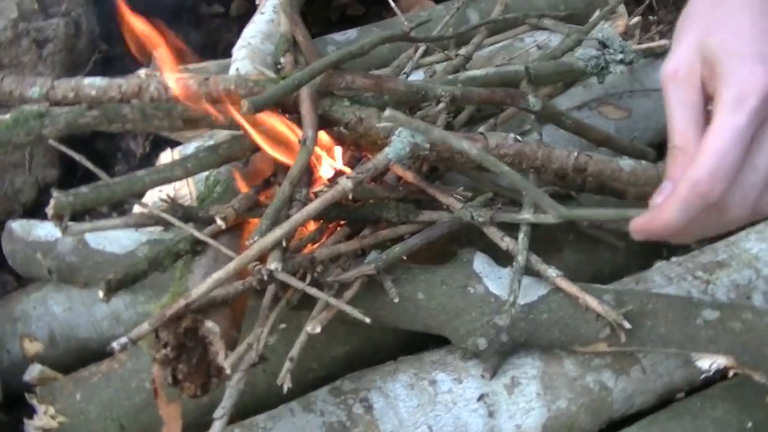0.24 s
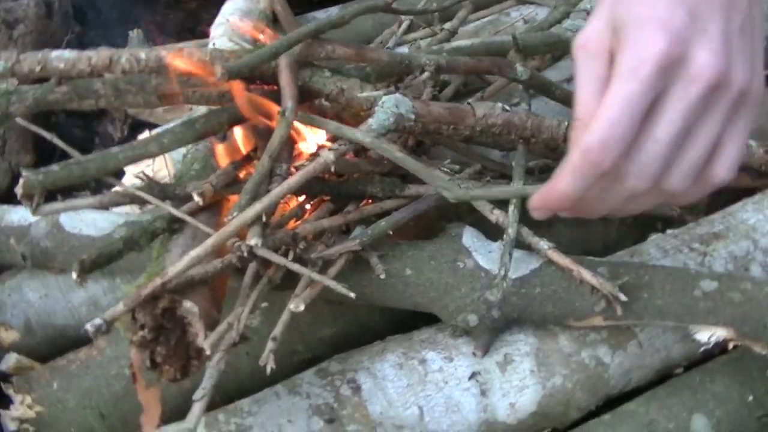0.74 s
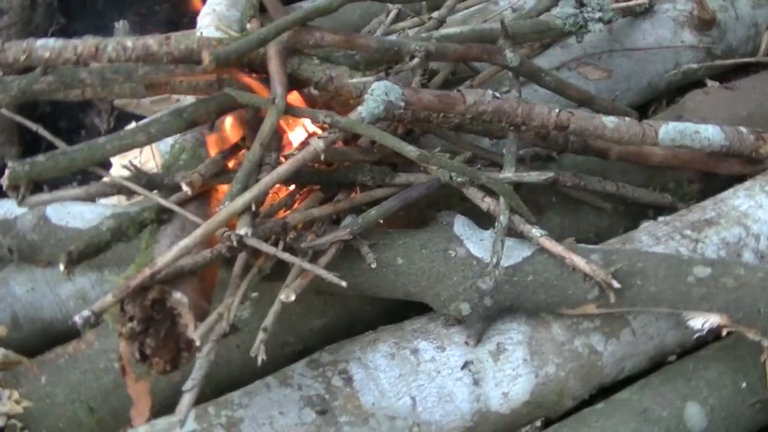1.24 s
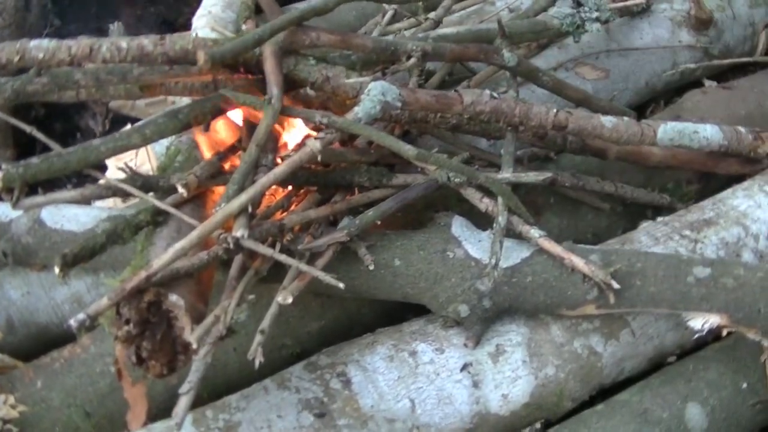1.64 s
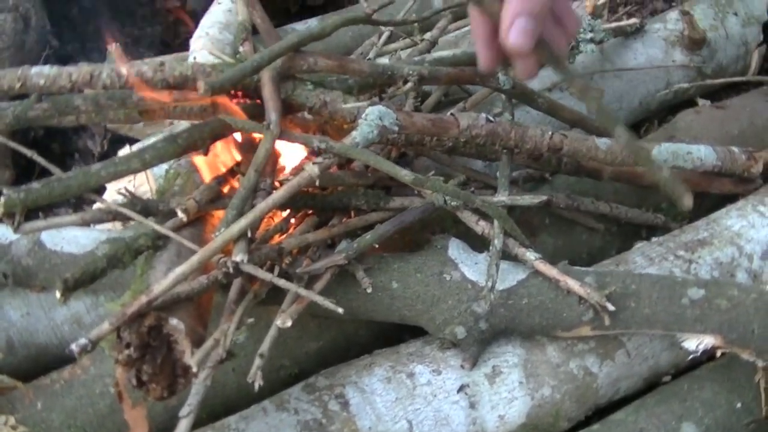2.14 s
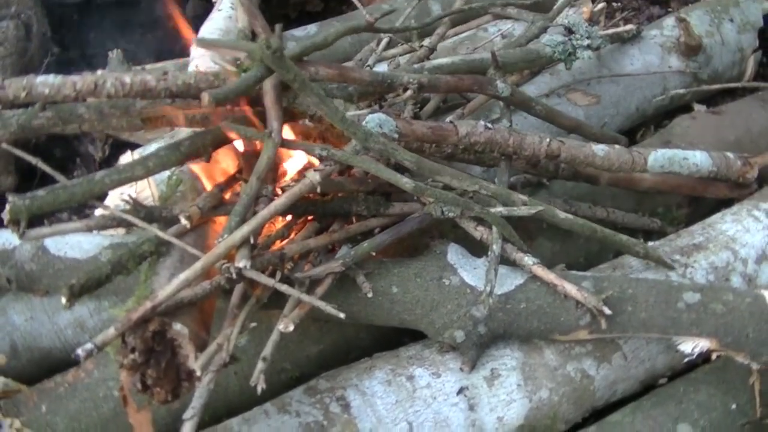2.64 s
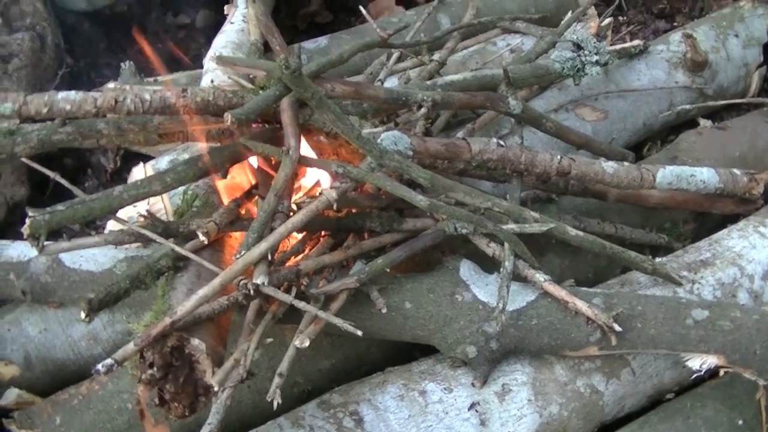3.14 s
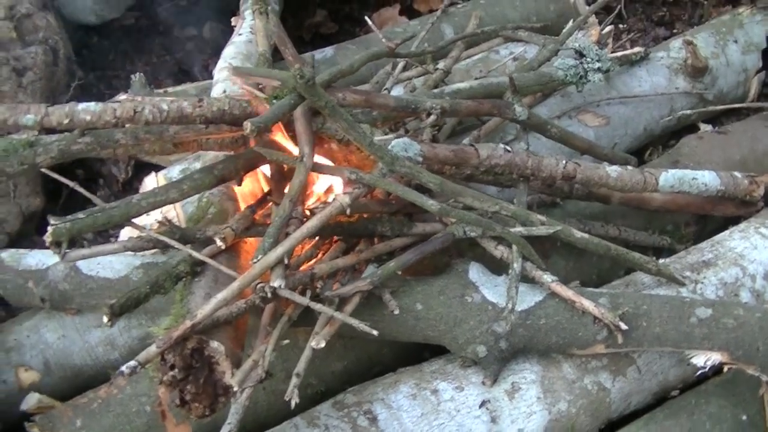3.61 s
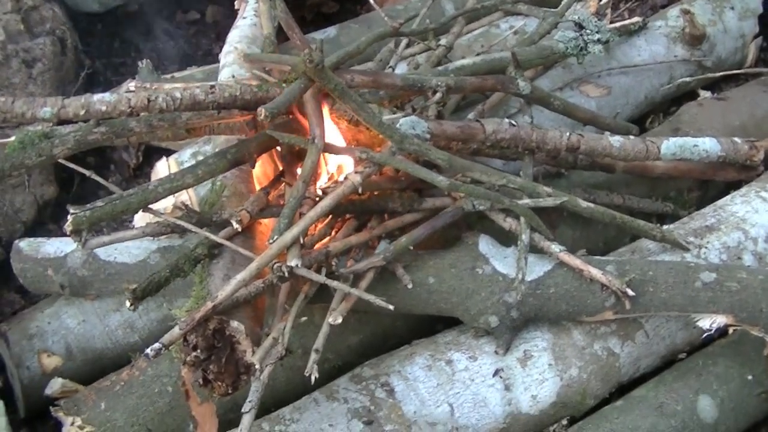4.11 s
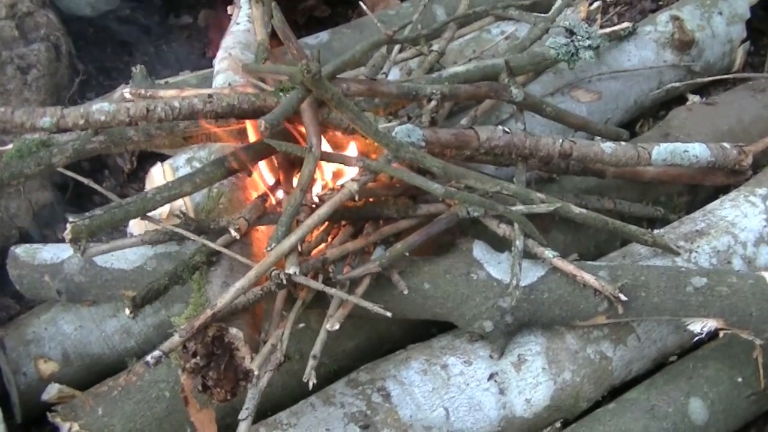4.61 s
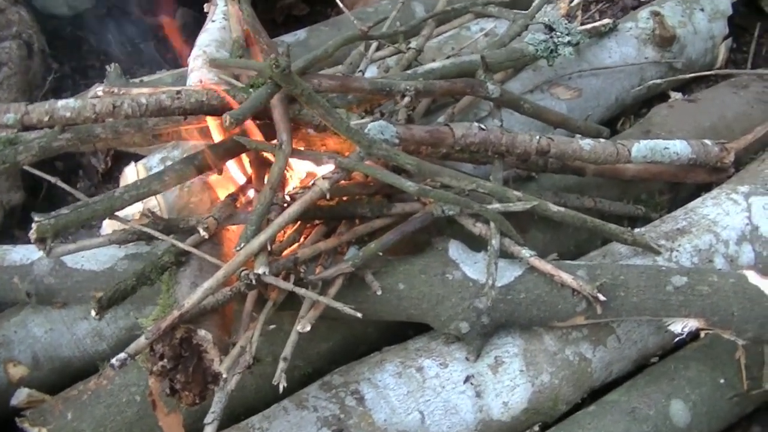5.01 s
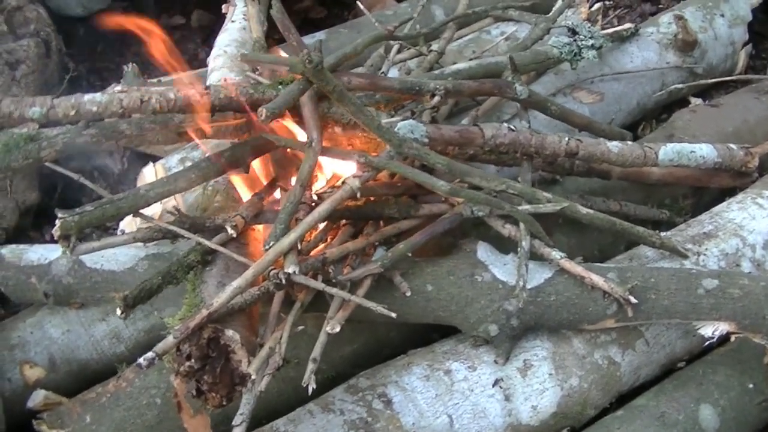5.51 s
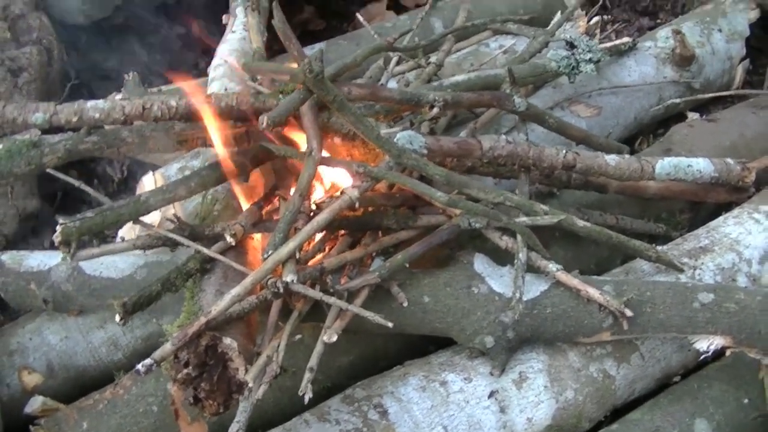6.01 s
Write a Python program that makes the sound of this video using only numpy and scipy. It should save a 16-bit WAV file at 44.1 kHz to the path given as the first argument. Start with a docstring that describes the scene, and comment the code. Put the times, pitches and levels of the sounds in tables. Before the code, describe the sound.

Close stereo pickup of a small fire of thin, damp sticks in quiet, dry-sounding woodland. Sparse sharp cracks and faint ticks stand over a very soft low flame and steam hiss. Muffled gas puffs come now and then. Past the middle, litter rustles and sticks knock softly; then a stick snaps very loudly with splintering fibres, and steam sputters at the end.

```python
"""Small wood fire on a forest floor

Twigs crack and a stick breaks with a splintering snap: noise bursts ring the modes of thin dry wood.
Flame roars, flutters and puffs; steam hisses, spurts and whistles: shaped noise, damped pulses, a sine.
Litter rustles, a twig slips, loose twigs tap, sticks knock: swelling noise, clicks and short modes.
A faint dull echo of the wood and a bed of forest air lie behind."""
import sys
import numpy as np
from scipy import signal
from scipy.io import wavfile
from scipy.ndimage import uniform_filter1d

SR = 44100
rng = np.random.default_rng(int(sys.argv[2]) if len(sys.argv) > 2 else 0)


def store_wav(level_fs):
    """Save 16-bit WAV to argv[1]."""
    pcm = np.round(np.clip(np.atleast_2d(level_fs), -1, 1) * 32767)
    wavfile.write(sys.argv[1], SR, pcm.T.astype(np.int16))


N = 275794
T = np.arange(N) / SR
SHORT = T[:4096]   # time axis of one short event
LEFT_RIGHT = np.array([[1], [-1]])

# a stick gives way fibre by fibre; levels relative, body < 3.3 kHz, edge > 7.5 kHz:
# start_s, level_db, body_db, edge_db, tear_s
STICK_BREAK = [(5.43, -8.5, -4, -6.5, 0.0011), (5.4351, -36, -13, -21, 0.00089),
               (5.4446, -17.5, -23, 4.5, 0.0066), (5.4666, -25.5, -9, -2, 0.01),
               (5.4871, -36, -18, -1, 0.01)]


def from_db(db):
    """Decibels to amplitude ratio."""
    return 10 ** (np.asarray(db) / 20)


def rms_one(x):
    """Scale to rms 1."""
    return x / np.sqrt(np.mean(x ** 2) + 1e-20)


def peak_one(x, size):
    """Scale so that the loudest stretch of `size` samples of the channel mean has rms 1."""
    power = np.atleast_2d(x).mean(axis=0) ** 2
    return x / np.sqrt(uniform_filter1d(power, size).max() + 1e-20)


def in_time(rows):
    """Interpolate every column after the first over the time axis."""
    s, *columns = np.transpose(rows)
    return [np.interp(T, s, c) for c in columns]


def at_hz(points, hz):
    """Interpolate a spectrum on a log frequency axis."""
    points = np.array(points)
    return np.interp(np.log(hz), np.log(points[:, 0]), points[:, 1])


def butter(x, hz, kind, order=2):
    """Butterworth filter."""
    return signal.sosfilt(signal.butter(order, hz, kind, fs=SR, output="sos"), x)


def resonate(x, hz, width_hz):
    """Two-pole resonance with gain 1 on top."""
    r = np.exp(-np.pi * width_hz / SR)
    zeros = np.array([1, 0, -1]) * (1 - r * r) / 2
    poles = [1, -2 * r * np.cos(2 * np.pi * hz / SR), r * r]
    return signal.lfilter(zeros, poles, x + 1e-18)


def add(out, s, sound):
    """Mix a short event into the stereo buffer at time s."""
    at = max(round(s * SR), 0)
    out[:, at:at + sound.shape[-1]] += sound[..., :N - at]


def gate(start_s, length_s, attack_s, release_s):
    """Linear attack, hold, exponential release."""
    since = T - start_s
    return np.clip(since / attack_s, 0, 1) * np.exp(-np.maximum(since - length_s, 0) / release_s)


def drift(rate_hz):
    """Low-passed random modulation of rms 1, drawn at every 40th sample."""
    r = np.exp(-80 * np.pi * rate_hz / SR)
    slow = signal.lfilter([1], [1, -2 * r, r * r], rng.standard_normal(N // 40 + 2002))
    slow = slow[2000:]   # drop the filter's start-up
    return np.interp(np.arange(N) / 40, np.arange(len(slow)), rms_one(slow))


def banded_noise(spectrum, patchy_db, patch_rate_hz):
    """Log-spaced bands of stereo noise, each with own level, flicker and likeness; mono rms 1."""
    # left-right correlation of the noise: hz, likeness (-1 to 1)
    likeness = [(40, 0.99), (150, -0.15), (400, -0.16), (1000, 0.34), (3000, 0.56), (7000, 0.49),
                (11000, -0.037), (15000, -0.22)]
    out, together = 0, drift(patch_rate_hz)
    edges = np.geomspace(spectrum[0][0], min(spectrum[-1][0], .45 * SR), len(spectrum) * 2)
    white = rng.standard_normal((2, 2, N))
    for k, (low, high) in enumerate(zip(edges, edges[1:])):
        mid, side = butter(white[k % 2], [low, high], "band")   # neighbours use different noise
        hz = np.sqrt(low * high)
        alike = np.clip(at_hz(likeness, hz), -1, 1)
        flicker_db = patchy_db * (together / 2 + drift(patch_rate_hz))
        stereo = np.sqrt(1 + alike) * mid + np.sqrt(1 - alike) * side * LEFT_RIGHT
        out = out + from_db(at_hz(spectrum, hz) + flicker_db) * stereo
    return out / np.sqrt(np.mean(out.mean(axis=0) ** 2))


def twig(force, bulk=1):
    """Modes of thin dry wood in parallel; a bulkier piece rings lower."""
    # modes of a cracking twig at bulk 1: pitch_hz, width_hz, level_db
    mode_rows = [(2090, 346, 0.5), (3050, 780, -0.5), (4220, 310, 4), (4974, 340, 1), (6520, 400, -3.5),
                 (9140, 2400, -9.5), (9680, 760, -4.5), (13200, 3700, -25.5)]
    modes = sum((-1) ** k * from_db(db) * resonate(force, hz / bulk, width_hz)
                for k, (hz, width_hz, db) in enumerate(mode_rows))
    # a thin twig radiates little below its first mode; the pile under it adds a faint body
    return butter(modes, 1740, "high", order=6) + from_db(-16.5) * resonate(force, 440, 1600)


def ticks(per_s, size_db):
    """Random tiny fractures of uneven size and left-right balance, ringing as twigs; rms 1."""
    sizes = from_db(size_db * np.minimum(rng.exponential(1, N), 4)) * rng.choice([-1, 1], N)
    clicks = sizes * (rng.random(N) < per_s / SR)
    return rms_one(twig(clicks * (1 + .5 * rng.standard_normal((2, N)))))


def fractures(rows, first_db, spread, scatter_db, scatter_s, low_db, high_db):
    """One sharp release and a short tearing; the woodpile scatters it for a few ms."""
    bulk_spread, pan_spread_db = 0.025, 0.5   # twigs differ a little in thickness and place
    out = np.zeros((2, N))
    for s, db, body_db, edge_db, tear_s in rows:
        white = rng.standard_normal((5, len(SHORT)))
        bulk, pan_db = rng.standard_normal(2) * [bulk_spread, pan_spread_db]
        force = (white[0] + spread * white[1:3]) * np.exp(-SHORT / max(tear_s, 1e-4))
        force[:, 0] += from_db(first_db)
        scatter = from_db(scatter_db) * white[3:] * np.exp(-SHORT / scatter_s)
        sound = twig(force + scatter, np.exp(bulk))
        # every twig has its own balance of body and edge
        body = from_db(body_db + low_db) * rms_one(butter(sound, 3300, "low", order=4))
        middle = rms_one(butter(sound, [3300, 7500], "band", order=3))
        edge = from_db(edge_db + high_db) * rms_one(butter(sound, 7500, "high", order=4))
        add(out, s, peak_one(middle + body + edge, size=88) * from_db(db + pan_db / 2 * LEFT_RIGHT))
    return out


def crack_rows():
    """Listed cracks and faint chance ones; the harder a twig cracks, the sooner it is torn through."""
    # cracking twigs, levels relative: start_s, level_db, body_db (< 3.3 kHz), edge_db (> 7.5 kHz)
    loud = [(0.5943, -31.5, -14, -4), (0.6343, -23, -9, -15), (0.913, -37.5, -15, -8.5),
            (1.0078, -38, -10.5, -6), (1.063, -49, -26, -12), (1.112, -47, -14, -10),
            (1.24, -45.5, -12, -6.5), (1.3124, -41.5, -24, -13), (1.5578, -37, -13, -4.5),
            (1.5913, -36, -13, -6.5), (1.6911, -45, -15, -5), (1.7395, -41.5, -14.5, -9),
            (1.7503, -40.5, -29, -1), (1.8774, -49.5, -18, -7), (2.2214, -24.5, -15.5, -6),
            (2.516, -48, -14, -8.5), (2.5406, -41.5, -18, -7), (2.5702, -19.5, -5.5, -10.5),
            (2.6858, -44, -16, -4.5), (2.6915, -43, -20, -5.5), (3.0484, -48, -15, -3),
            (3.119, -39.5, -18, -3), (3.139, -29, 3.5, -4), (3.4438, -30.5, -12, -9.5),
            (3.5528, -41, -8, -18), (3.7102, -44.5, -9, 3), (4.45, -32, -12.5, -7.5), (4.4545, -33, -13, 6),
            (4.6097, -44, -8, -22), (4.8618, -37, -15, -19), (5.004, -47, -16, -9),
            (5.2734, -43.5, -18.5, -23), (5.3267, -41, -9, 0), (5.7395, -37.5, -3, -31)]
    faint_per_s, faint_db, faint_spread_db, faint_body_db, faint_edge_db = 2.2, -50, 2.5, -13, -9
    # tearing time at row level -35 dB, and the rise in dB that halves it
    tear_s, tear_halves_db = 0.0016, 38
    chance = rng.random((round(faint_per_s * N / SR), 2))
    faint = [(when * T[-1], faint_db + faint_spread_db * (2 * size - 1), faint_body_db, faint_edge_db)
             for when, size in chance]
    return [(s, db, body_db, edge_db, tear_s * 2 ** (-(db + 35) / tear_halves_db))
            for s, db, body_db, edge_db in loud + faint]


def cracks():
    """Twigs crack in the heat: sharp releases with very short tearing."""
    return from_db(1.5) * fractures(crack_rows(), first_db=17, spread=0.38, scatter_db=-9,
                                    scatter_s=0.003, low_db=5.5, high_db=1.5)


def breaking_stick():
    """A stick snaps in a quick run of fractures with longer tearing."""
    return from_db(-1.0) * fractures(STICK_BREAK, first_db=13, spread=0.3, scatter_db=-7,
                                     scatter_s=0.0055, low_db=-7.0, high_db=2.5)


def splinters(level_db, t60_s):
    """Fibres and bark keep tearing after the stick starts to break, dying away exponentially."""
    since = T - STICK_BREAK[0][0]
    fibres = ticks(per_s=3000, size_db=4)
    return fibres * from_db(level_db - 60 * np.abs(since) / t60_s) * (since > 0)


def taps(level_db, width_hz, click_db):
    """Loose twigs land or spring free: a small click and two briefly ringing bending modes."""
    # taps, levels relative: start_s, level_db, low_mode_hz, high_mode_hz
    tap_rows = [(0.6346, -24, 2570, 2600), (1.511, -40, 1440, 2880), (2.117, -40, 2030, 2310),
                (2.3925, -28.5, 2000, 3550), (2.4102, -37.5, 1920, 3400), (2.631, -41, 1440, 2370),
                (2.7643, -39.5, 1590, 2300), (5.487, -17, 3220, 3270)]
    out = np.zeros((2, N))
    for s, db, low_hz, high_hz in tap_rows:
        rough = rng.standard_normal(len(SHORT)) + .5 * rng.standard_normal((2, len(SHORT)))
        touch = np.exp(-SHORT / 0.0019) * rough
        low = 0.43 * rms_one(resonate(touch, low_hz, width_hz))
        high = rms_one(resonate(touch, high_hz, width_hz))
        click = from_db(click_db) * rms_one(twig(touch))
        add(out, s, peak_one(low + high + click, size=88) * from_db(db + level_db))
    return out


def flame(roar_db, flutter_db, flutter_hz):
    """A lumpy low roar, and a throbbing flutter whenever a gas jet burns unsteadily."""
    # relative roar level: time_s, level_db
    roar_level = [(0, -63), (0.9, -67.5), (2.9, -66), (4.1, -67), (4.4, -60), (4.9, -65), (5.6, -62),
                  (6.25, -62)]
    # relative roar spectrum: hz, density_db
    roar_spectrum = [(25, -6.5), (70, -2.5), (150, 3.5), (330, 2.5), (450, -1), (600, -17), (900, -1.5),
                     (1500, -45)]
    # unsteady gas jets, levels relative: start_s, length_s, level_db
    flutter_rows = [(2.05, 0.1, -59), (3.57, 0.14, -46), (4.993, 0.14, -55.5)]
    pan_db = 1.3   # the flame burns a little to the left
    roar = banded_noise(roar_spectrum, patchy_db=3.5, patch_rate_hz=13.0)
    roar = roar * from_db(in_time(roar_level)[0] + roar_db)
    eddies = butter(resonate(rng.standard_normal(N), flutter_hz, 270), 375, "low", order=8)
    throb = from_db(1.8 * drift(45))
    jets = sum(from_db(db + flutter_db) * gate(s, length_s, attack_s=0.012, release_s=0.012)
               for s, length_s, db in flutter_rows)
    return (roar + rms_one(eddies * throb) * jets) * from_db(pan_db / 2 * LEFT_RIGHT)


def puffs(level_db, damping, swell_db, swell_hz):
    """A gas pocket flares: one heavily damped swing of pressure and a slower swell behind it."""
    # pockets of gas catching, levels relative: start_s, level_db, pitch_hz
    puff_rows = [(0.02, -46, 120), (0.119, -45.5, 149), (0.604, -36.5, 364), (0.634, -40, 268),
                 (0.828, -40.5, 338), (1.098, -43, 190), (1.499, -46.5, 120), (1.667, -43.5, 123),
                 (1.8, -46, 320), (2.605, -31.5, 146), (3.162, -44, 298), (3.552, -30, 218),
                 (5.74, -34.5, 130)]
    out = np.zeros((2, N))
    for s, db, hz in puff_rows:
        push = SHORT * hz * np.exp(-SHORT * hz * 7)
        swing = peak_one(butter(resonate(push, hz, damping * hz), 63, "high"), size=88)
        swell = from_db(swell_db) * peak_one(resonate(push, swell_hz, 40), size=88)
        add(out, s, (swing + swell) * from_db(db + level_db + LEFT_RIGHT))   # 2 dB to the left
    return out


def steam(hiss_db):
    """Steam leaves the damp wood as a hiss; the harder it flows, the louder the bark ticks."""
    # relative steam flow: time_s, level_db
    flow_rows = [(0, -53.5), (0.5, -63.5), (0.9, -61.5), (1.9, -61), (2.5, -58.5), (4.2, -58.5),
                 (5.1, -52.5), (6.25, -55)]
    # relative hiss spectrum: hz, density_db
    hiss_spectrum = [(500, -12.5), (1200, -7), (1700, 0.5), (2400, 1.5), (3200, 3), (4500, 2.5),
                     (5700, -1.5), (6700, -7.5), (8000, -6.5), (10000, -8.5), (13000, -24), (16000, -73)]
    flow_db, = in_time(flow_rows)
    hiss = from_db(hiss_db) * banded_noise(hiss_spectrum, patchy_db=3.0, patch_rate_hz=16.0)
    bark = from_db(-12) * ticks(per_s=70, size_db=6)
    return from_db(flow_db) * (hiss + bark)


def spurts(level_db, sputter_db):
    """Steam bursts from a split in the wood, sputters and dies back."""
    # spurts, levels relative: peak_s, level_db
    spurt_rows = [(1.31, -57), (3.3, -56), (5.69, -48.5), (5.8, -48), (5.95, -49.5), (6.089, -48),
                  (6.202, -42.5)]
    # resonances of the split: pitch_hz, width_hz, level_db
    vent_modes = [(2680, 390, 9), (3700, 1240, 6), (7600, 260, -11.5), (11100, 530, -10)]
    spurt_s = 0.044   # time to swell, and to fade
    swells = sum(from_db(db) * np.exp(-np.minimum(((T - s) / spurt_s) ** 2, 20)) for s, db in spurt_rows)
    jet = rng.standard_normal(N) + .5 * rng.standard_normal((2, N))
    vent = sum(from_db(db) * resonate(jet, hz, width_hz) for hz, width_hz, db in vent_modes)
    return rms_one(butter(vent, 1000, "high")) * swells * from_db(level_db + sputter_db * drift(60))


def whistle(level_db):
    """Steam sings through one pore: a gliding sine with a random amplitude."""
    # pore tone, levels relative: time_s, pitch_hz, level_db
    tone_rows = [(5.86, 8190, -72), (5.98, 8140, -52.5), (6.06, 7930, -66), (6.25, 8340, -52)]
    hz, db = in_time(tone_rows)
    tone = np.sin(2 * np.pi * np.cumsum(hz) / SR)
    return from_db(db + level_db) * (T > tone_rows[0][0]) * drift(73) * tone


def rustle(level_db, crisp_db, snap_db, snaps_per_s, snap_size_db):
    """Dry leaves slide over each other: a swish full of tiny snaps builds to a peak and stops."""
    # stirs, levels relative, crisp_db of the treble layer: peak_s, level_db, build_s, crisp_db
    stir_rows = [(0.09, -54.5, 0.063, -0.5), (2.059, -56, 0.24, -51), (3.70, -52, 0.069, -3),
                 (3.86, -52.5, 0.064, -13), (4.065, -48.5, 0.12, 1.5), (4.437, -39, 0.095, -21),
                 (4.70, -44, 0.039, -24), (4.745, -51.5, 0.018, -9), (5.548, -41, 0.069, -7)]
    # relative swish spectrum: hz, density_db
    leaf_spectrum = [(600, -19), (1300, -7.5), (2000, -2), (3200, -0.5), (4600, 0), (5700, 0.5),
                     (6700, -22), (8000, 2)]
    # relative treble-layer spectrum: hz, density_db
    crisp_spectrum = [(5500, 1), (7200, 6), (9500, 1.5), (11000, -4), (12500, -5), (15000, -53)]
    release_s, shape = 0.052, 2.2   # shape 1 is a sharp crest, 2 a round one
    stir, crispness = 0, 0
    for s, db, build_s, crisp_share_db in stir_rows:
        away = np.maximum((s - T) / build_s, (T - s) / release_s)
        swell = from_db(db) * np.exp(-np.minimum(away ** shape, 20))
        stir = stir + swell
        crispness = crispness + swell * from_db(crisp_share_db)
    swish = from_db(level_db) * banded_noise(leaf_spectrum, patchy_db=6.5, patch_rate_hz=44)
    crisp = from_db(crisp_db) * banded_noise(crisp_spectrum, patchy_db=5.0, patch_rate_hz=16)
    snaps = from_db(snap_db) * ticks(per_s=snaps_per_s, size_db=snap_size_db)
    return stir * (swish + snaps) + crispness * crisp


def slip(start_s, level_db, length_s, attack_s, release_s, hz, width_hz):
    """A twig skids over bark: dense ticks through one broad resonance, a very short bright rasp."""
    rasp = rms_one(resonate(ticks(per_s=9000, size_db=1), hz, width_hz))
    return from_db(level_db) * rasp * gate(start_s, length_s, attack_s, release_s)


def knocks(level_db, width_hz, upper_db, upper_hz):
    """A soft, slightly rough contact rings a stick's bending mode and a higher one."""
    # knocking sticks, levels relative: start_s, level_db, pitch_hz
    knock_rows = [(4.458, -39, 473), (4.58, -49, 232), (4.688, -38.5, 330), (4.693, -37, 387),
                  (4.732, -45, 334), (5.3494, -44.5, 425), (5.395, -37, 410), (5.555, -48, 344),
                  (5.561, -46.5, 384), (5.588, -51, 246), (5.7403, -34.5, 330)]
    out = np.zeros((2, N))
    for s, db, hz in knock_rows:
        push = np.exp(-SHORT / 0.00096) * (1 + 0.63 * rng.standard_normal((2, len(SHORT))))
        sound = resonate(push, hz, width_hz) + from_db(upper_db) * resonate(push, upper_hz, 190)
        add(out, s, peak_one(sound, size=88) * from_db(db + level_db))
    return out


def forest_echo(x, level_db, t60_s):
    """Trunks return a faint, dull tail: convolution with decaying low-passed noise."""
    t = T[:SR]
    tail = butter(rng.standard_normal((2, SR)), 7400, "low")
    tail = tail * from_db(-60 * t / t60_s) * (1 - np.exp(-t / 0.024))
    tail = tail / np.sqrt(np.sum(tail ** 2) / 2)
    return from_db(level_db) * signal.fftconvolve(x, tail, axes=1)[:, :N]


def forest_air(level_db):
    """Still air among the trees: faint, nearly steady broadband noise."""
    # relative air spectrum: hz, density_db
    air_spectrum = [(30, -2), (200, -7), (600, -6), (900, -2.5), (1400, -4.5), (3000, -1), (15000, -8.5)]
    return from_db(level_db) * banded_noise(air_spectrum, patchy_db=.3, patch_rate_hz=10)


def scene():
    """Sum the fire, the litter beside it, the echo of the wood and the air."""
    wood = cracks() + breaking_stick() + splinters(level_db=-33.5, t60_s=0.3)
    wood = wood + taps(level_db=-5.0, width_hz=140, click_db=-12)
    burning = flame(roar_db=1.0, flutter_db=-2.0, flutter_hz=270)
    burning = burning + puffs(level_db=-4, damping=0.72, swell_db=-7.5, swell_hz=75.6)
    vapour = steam(hiss_db=-3) + spurts(level_db=-4.5, sputter_db=3.0) + whistle(level_db=-7.5)
    litter = rustle(level_db=-3, crisp_db=-5.5, snap_db=-6, snaps_per_s=700, snap_size_db=0.5)
    litter = litter + slip(start_s=4.137, level_db=-38.5, length_s=0.0065, attack_s=0.0019,
                           release_s=0.0015, hz=5640, width_hz=4300)
    litter = litter + knocks(level_db=2.0, width_hz=99, upper_db=-9.5, upper_hz=840)
    echo = forest_echo(wood, level_db=-53, t60_s=0.83)
    return wood + burning + vapour + litter + echo + forest_air(level_db=-63)


def record(dry):
    """Each microphone port adds its own resonance; tanh rounds the peaks and the top is cut."""
    left_port, right_port = (6860, 590, 0.69), (4750, 1400, 0.49)   # hz, width_hz, boost
    treble_lean, lean_hz, cutoff_hz = 0.068, 6460, 16000
    coloured = np.array([x + boost * resonate(x, hz, width_hz)
                         for x, (hz, width_hz, boost) in zip(dry, (left_port, right_port))])
    # the left port hears a little more treble, the right one less
    coloured = coloured + treble_lean * butter(coloured, lean_hz, "high", order=1) * LEFT_RIGHT
    coloured[1] -= 2 * resonate(coloured[1], 15500, 3160)   # the right port turns the phase of the top treble
    top_cut = signal.ellip(10, .2, 80, cutoff_hz, fs=SR, output="sos")
    return signal.sosfilt(top_cut, np.tanh(coloured))


dry = scene()
out = record(dry)
store_wav(out)
```